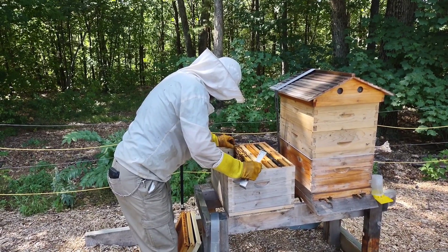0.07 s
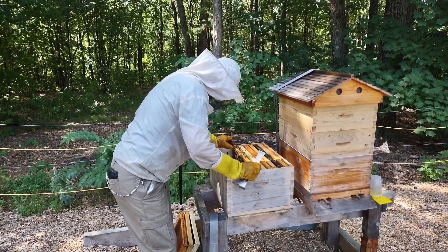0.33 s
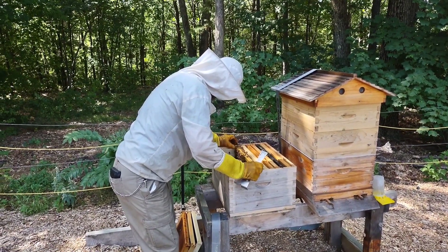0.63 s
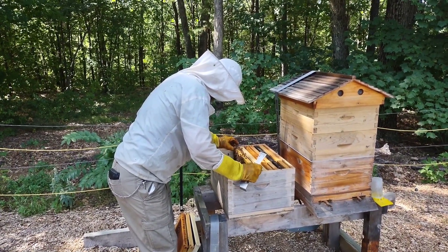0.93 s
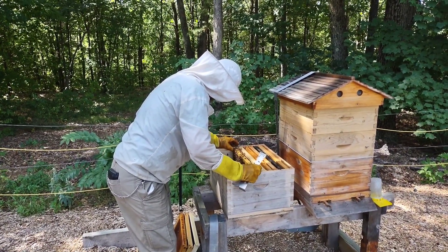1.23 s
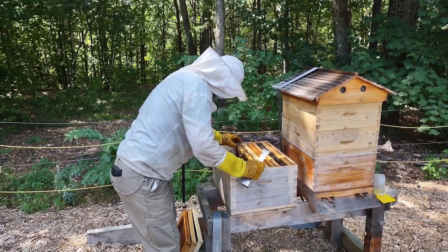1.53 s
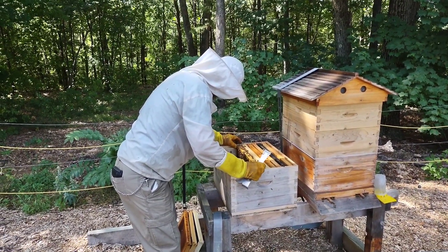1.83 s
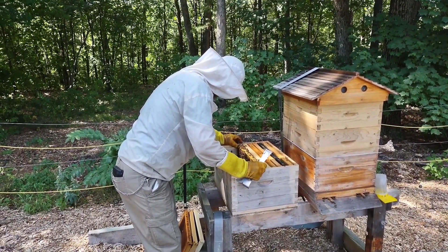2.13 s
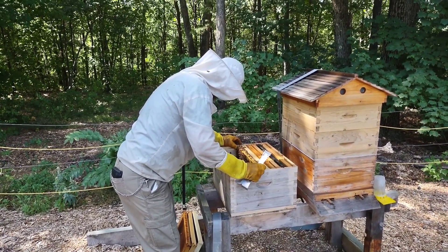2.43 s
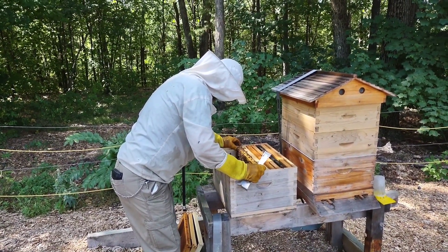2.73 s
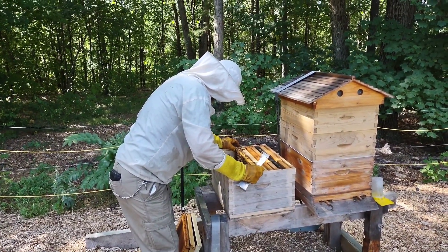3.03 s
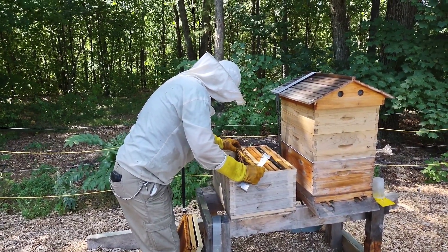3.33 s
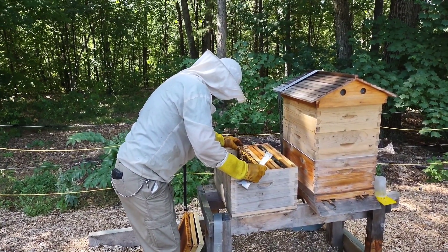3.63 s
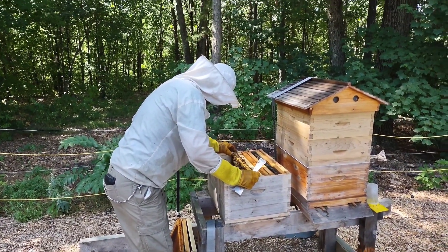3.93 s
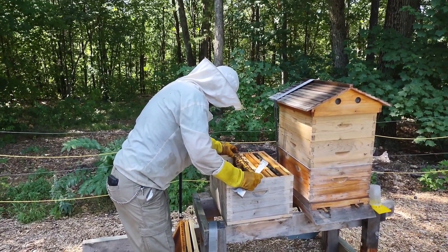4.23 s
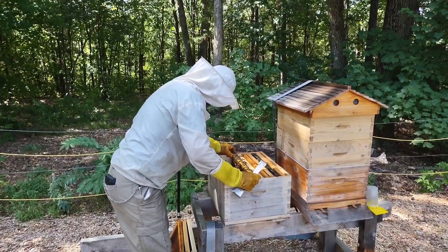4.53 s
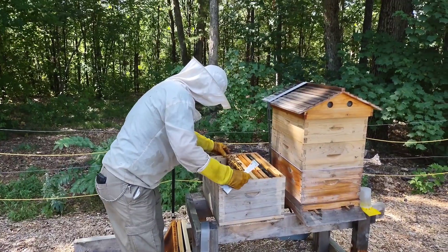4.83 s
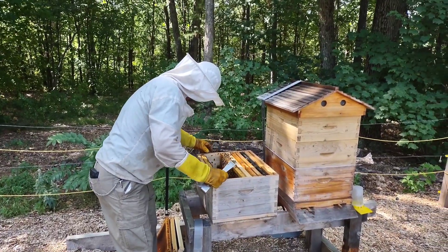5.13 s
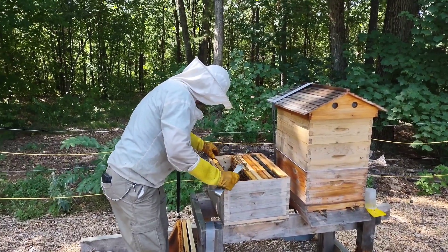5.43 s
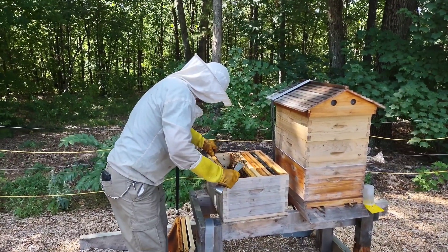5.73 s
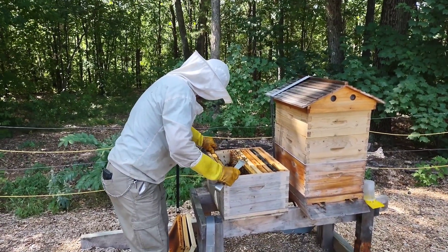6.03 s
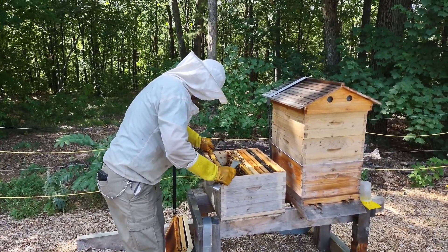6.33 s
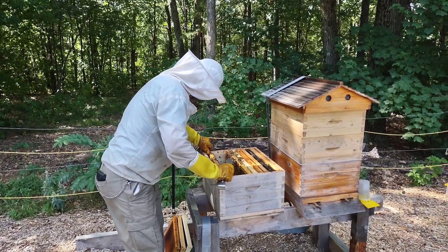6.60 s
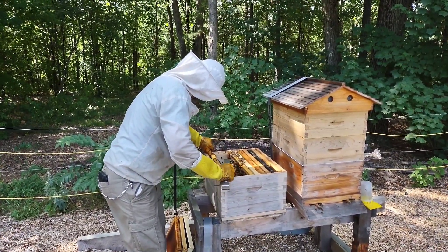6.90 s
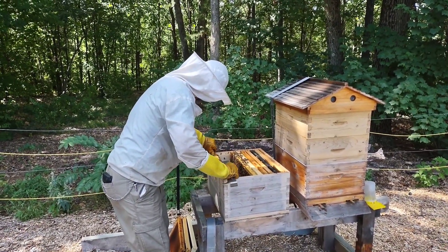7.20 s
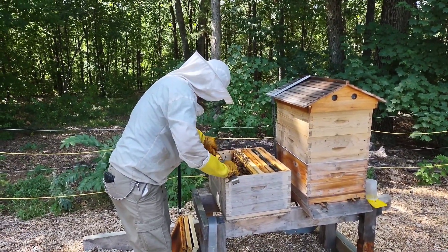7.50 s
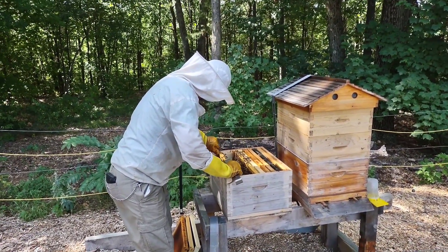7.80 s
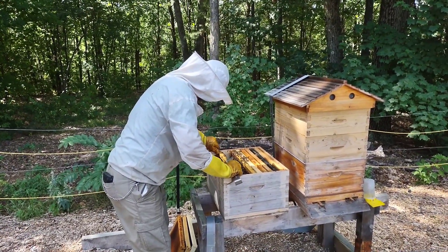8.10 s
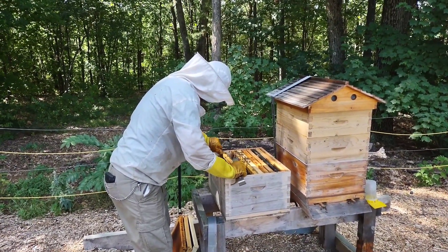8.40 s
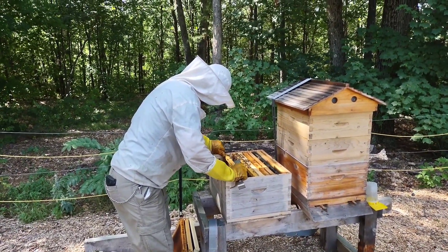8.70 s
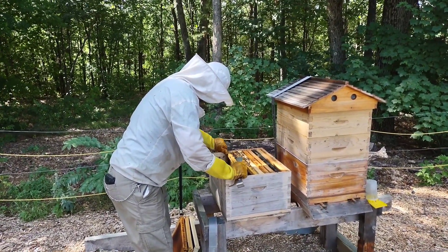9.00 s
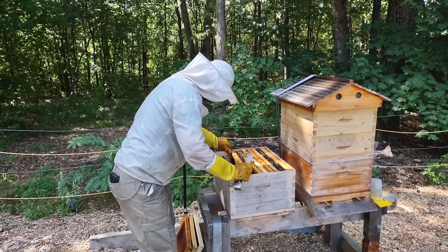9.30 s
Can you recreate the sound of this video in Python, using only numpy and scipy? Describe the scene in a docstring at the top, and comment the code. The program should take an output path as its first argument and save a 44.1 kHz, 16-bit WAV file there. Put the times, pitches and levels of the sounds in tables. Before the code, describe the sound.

Outdoors beside a beehive, a low swarm hum fills the middle, with a single bee swelling and fading near the microphone. Slightly to the right, a sticky wooden frame rasps quietly, gives one knock and then a short rattle of knocks. A thin insect trill and faint woodland whistles sit behind. In the second half a small metal tick sounds and the buzzing grows louder and closer.

```python
"""Honeybees hum around an open wooden hive at the edge of a wood. From the start, one bee's wingbeats
stand out of the swarm over a deep drone that comes and goes, while a frame rubs in its box, an insect
trills high up and faint whistles carry from the trees. The frame knocks once at 2.4 s and judders near
4 s. Around 6 s the bees are stirred up and the drone returns; a metal tool ticks at 6.4 s, and the
nearest bee is at its loudest from there to the end."""
import sys
import numpy as np
from scipy import signal
from scipy.fft import rfft, irfft
from scipy.io import wavfile
from scipy.ndimage import map_coordinates

SR = 44100
rng = np.random.default_rng(int(sys.argv[2]) if len(sys.argv) > 2 else 0)


def to_wav(sig):
    """Store sig (one row per channel, or 1-D mono) as 16-bit WAV at the path in sys.argv[1].

    Samples outside -1..1 are clipped; the rate is SR.
    """
    pcm = np.clip(np.atleast_2d(sig), -1, 1) * 32767
    pcm = np.round(pcm).astype(np.int16)
    wavfile.write(sys.argv[1], SR, pcm.T)  # frames by channels


N = 421155
T = np.arange(N) / SR  # time of each sample [s]
F = np.maximum(np.fft.rfftfreq(N, 1 / SR), 1)  # frequencies of the spectrum [Hz]
RIGHT_LAG_S = 0.000444  # how much later a sound reaches the right side

# how fast the nearest bee beats its wings: (time [s], wingbeat [Hz])
WINGBEAT_RATE = [(0, 141), (1.1, 140.5), (2.2, 140.5), (3.2, 140), (3.9, 138), (4.6, 137.5), (5.5, 138),
                 (6.3, 136.5), (6.9, 135.5), (7.3, 135), (8, 135.6), (8.7, 134.2), (9.55, 133.2)]
# its tone at the wingbeat rate, the first harmonic: (time [s], level [dB])
FIRST_HARMONIC = [(0.0, -58), (0.65, -53.0), (1.1, -57.5), (1.3, -64), (1.5, -56), (2.0, -56.5), (2.2, -50),
                  (2.75, -55), (3.15, -47.5), (3.78, -68), (3.96, -55.5), (4.2, -77), (4.6, -53),
                  (5.0, -73.5), (5.65, -59.5), (6.3, -64.0), (6.75, -42), (7.02, -39.0), (7.42, -58.5),
                  (7.7, -49.5), (7.85, -55), (8.7, -40.5), (9.3, -46.5), (9.55, -54)]
# its tone at twice that rate: (time [s], level [dB])
SECOND_HARMONIC = [(0.0, -73.5), (2.08, -72.5), (2.25, -56.5), (2.9, -59.0), (3.18, -53.5), (3.7, -68.5),
                   (4.0, -60), (4.25, -69.0), (4.55, -58.5), (5.2, -68), (5.55, -59.5), (6.25, -74),
                   (6.75, -50), (7.0, -57.5), (7.3, -50.5), (7.5, -64.5), (7.72, -50.5), (8.15, -60.5),
                   (8.55, -54), (9.22, -47.5), (9.55, -54)]
# its tone at three times that rate, heard once the bee is close: (time [s], level [dB])
THIRD_HARMONIC = [(0.0, -84), (6.25, -80), (6.72, -69.0), (6.88, -58.5), (7.25, -63), (7.5, -67.5),
                  (8.03, -61.0), (8.55, -64.0), (9.35, -48), (9.55, -51.5)]
# how busy the swarm is: (time [s], relative level [dB])
SWARM_ACTIVITY = [(0.0, -64.5), (0.9, -62.5), (2.05, -65), (2.3, -60), (3.1, -58.5), (4.2, -66), (4.6, -62),
                  (5.1, -67.5), (6.4, -66), (6.95, -54), (7.6, -62), (8.6, -55.5), (9.0, -57), (9.3, -55),
                  (9.55, -54.5)]
# the swarm's low hum: (frequency [Hz], relative level [dB])
HUM_SPECTRUM = [(18, -42), (28, -18), (45, 1), (60, 4.5), (105, 11), (180, 6), (240, 4.5), (300, -7.5),
                (420, -41), (900, -63.5)]
# the swarm's brighter buzz: (frequency [Hz], relative level [dB])
BUZZ_SPECTRUM = [(50, -49.5), (200, -9.5), (290, 0.5), (350, -2), (440, -7), (540, -21.5), (660, -17),
                 (880, -13), (1150, -23), (2200, -28.5), (3200, -38), (8000, -77)]
# the murmur inside the box: (time [s], level [dB])
COLONY_LEVEL = [(0, -74), (3.6, -75.5), (4.6, -84), (6.2, -82), (6.9, -74), (8.5, -78.5), (9.55, -84)]
# the deep drone, one list for each swell: (time [s], pitch [Hz], level [dB])
DRONE_SWELLS = [
    [(0, 73.5, -53.5), (.25, 73.2, -53), (.85, 73.1, -58.5), (1.6, 72.6, -56.5), (1.92, 72.5, -53),
     (2.1, 69.5, -60)],
    [(5.9, 76.7, -58.5), (6.59, 77.7, -48.5), (6.75, 75.3, -48.5), (7.24, 75.2, -46), (7.44, 73.5, -55),
     (7.8, 73.3, -48.5), (8.05, 72.5, -56), (8.35, 71.8, -51), (9.55, 74.3, -48)],
]
# the background wash among the trees: (frequency [Hz], relative level [dB])
AIR_SPECTRUM = [(20, -14.5), (60, 5), (300, -2), (520, -7), (820, -2), (1150, -9), (1600, -12.5),
                (2200, -15.5), (3200, -22), (4200, -22.5), (6000, -27), (10000, -29.5), (15500, -31)]
# where wood sliding on wood rings: (frequency [Hz], width [Hz], relative level [dB])
RASP_RESONANCES = [(2130, 370, -1.5), (2590, 300, 1.5), (3200, 520, 2.5), (3820, 680, -3), (4360, 380, -2)]
# the hiss of rubbing: (frequency [Hz], relative level [dB])
RUB_SPECTRUM = [(900, -13.5), (1800, -9), (2100, -4), (2900, -7), (4200, -8), (5200, -16), (7500, -21.5),
                (11000, -23.5), (15000, -50.5)]
# firmer strokes of the frame: (peak time [s], spread [s], level [dB])
FRAME_STROKES = [(1.75, 0.31, -71.5), (2.225, 0.16, -71), (2.947, 0.64, -76), (4.078, 0.11, -75.5),
                 (8.35, 0.15, -80.5)]
# when the near insect trills: (start [s], end [s], level [dB])
TRILL_PHRASES = [(-.5, 4.35, -88), (4.8, 5.1, -82.5)]
# thin insect whines: (start [s], end [s], start pitch [Hz], end pitch [Hz], width [Hz], level [dB])
INSECT_WHINES = [(-.4, 2.24, 8020, 8130, 80, -85), (2.6, 3.3, 7830, 8070, 110, -87),
                 (3.1, 4.3, 8100, 7960, 89.5, -85), (4.2, 5.4, 8000, 7850, 90, -89.5),
                 (6.1, 7.5, 7950, 8100, 70, -91.5), (7.4, 8.2, 8040, 8070, 70, -93),
                 (6.4, 8.83, 8670, 8760, 70, -100)]
# whistles in the trees: (start [s], end [s], start pitch [Hz], end pitch [Hz], width [Hz], level [dB])
TREE_WHISTLES = [(-.3, 0.406, 760, 738, 27, -67), (0.1, 1.8, 4720, 4420, 230, -84),
                 (2.7, 3.8, 4380, 4600, 160, -93), (4, 5.4, 4300, 4120, 160, -82),
                 (5.15, 5.75, 3500, 3860, 290, -83), (1.15, 2.6, 2040, 2070, 260, -73),
                 (1.3, 2.5, 510, 590, 104, -72), (-1, 3.1, 3000, 2900, 90, -94),
                 (4, 5.2, 3280, 3260, 95, -79), (4.22, 4.78, 1360, 1450, 70, -70.5),
                 (4.95, 6.3, 830, 850, 110, -68.5), (5, 6.1, 2080, 1880, 200, -84),
                 (7.1, 8.3, 2170, 2150, 99, -83.5), (8.2, 8.7, 2100, 2130, 280, -72.5)]
# faint extra tones around the nearest bee's harmonics: (start [s], end [s], pitch [Hz], level [dB])
WING_UNDERTONES = [(1.497, 2.05, 425, -72.5), (2.2, 3.504, 186.8, -62.5), (2.096, 3.4, 231, -67),
                   (3.595, 4.902, 227.7, -66.5), (4.1, 5.6, 90, -66), (4.3, 4.9, 181, -70),
                   (4.3, 4.9, 317.5, -74), (6.8, 9.9, 179, -63.5), (7.6, 8.151, 344, -59),
                   (7.8, 8.801, 310.6, -59.5), (8.302, 9.703, 222, -66), (8.7, 9.7, 353.7, -67.5)]
# the frame hitting its box: (time [s], level [dB], decay [s], relative level of the grit [dB])
FRAME_KNOCKS = [(2.439, -58.5, 0.033, -25), (3.895, -57.5, 0.025, -18), (3.92, -56, 0.042, -13),
                (3.958, -58, .04, -19), (3.986, -57.5, 0.094, -16), (4.068, -70, 0.055, -14)]
# where frame and box ring: (frequency [Hz], width [Hz], relative level [dB])
BOX_RESONANCES = [(175, 110, 11.5), (610, 250, 0.5), (780, 130, 4), (974, 110, 1.5), (1320, 330, -9),
                  (1790, 320, -6.5), (2460, 360, -13), (3300, 420, -12)]
# light brushes of the gloves: (peak time [s], spread [s], frequency [Hz], width [Hz], level [dB])
GLOVE_BRUSHES = [(3.018, .05, 7340, 2500, -83), (3.16, 0.16, 2010, 2500, -76.5),
                 (5.13, 0.064, 4180, 3000, -78.5), (7.704, 0.064, 1900, 1500, -83)]
# the two parts of the tool's tick: (time [s], decay [s], frequency [Hz], width [Hz], level [dB])
TICK_PARTS = [(6.425, 0.022, 4700, 2000, -75), (6.425, 0.033, 3160, 300, -74)]


def undb(db):
    """Turn decibels into a gain to multiply by."""
    return 10 ** (np.asarray(db) / 20)


def unit(x):
    """Scale a signal to an average (rms) level of 1."""
    return x / np.sqrt(np.mean(x ** 2))


def curves(table):
    """Join each column of a table with straight lines over time."""
    times, *columns = np.transpose(table)
    return [np.interp(T, times, column) for column in columns]


def held(start, end, fade_s):
    """A gain of 1 from start to end, dying away on both sides."""
    return np.exp(-np.abs(T - np.clip(T, start, end)) / fade_s)


def walk(rate):
    """A smooth random wobble of size about 1, turning about rate times a second."""
    steps = rng.standard_normal(4096)
    coarse = map_coordinates(steps, [T[::32] * rate], order=3, mode="wrap")
    return np.interp(T, T[::32], coarse)


def colour(spectrum):
    """Turn a spectrum table into a gain for every frequency."""
    hz, db = np.transpose(spectrum)
    return undb(np.interp(np.log(F), np.log(hz), db))


def band(hz, width):
    """A steep-sided resonance: it passes frequencies near hz and weakens the rest."""
    return (1 / (1 + 1j * (F / hz - hz / F) * hz / width)) ** 2


def ringing(resonances):
    """Add up the resonances of one object."""
    return sum(undb(db) * np.abs(band(hz, width)) for hz, width, db in resonances)


def tone(hz, lag_s):
    """A pure tone on a moving pitch, reaching the right side a little later."""
    cycles = np.cumsum(hz) / SR - hz * np.array([[0], [lag_s]])
    return np.sqrt(2) * np.sin(2 * np.pi * cycles)


def noise(gain, spread=0.75, split_hz=750, bass_spread=0.076):
    """Stereo noise shaped by gain: the bass is nearly alike on both sides, the treble mostly is not."""
    common, left, right = rfft(rng.standard_normal((3, N)))
    treble = 1 / (1 + (split_hz / F) ** 4)
    scattered = np.clip(bass_spread + treble * spread, 0, 1)
    lag = np.exp(-2j * np.pi * F * RIGHT_LAG_S * treble)
    shared = np.sqrt(1 - scattered) * np.array([common, common * lag])
    separate = np.sqrt(scattered) * np.array([left, right])
    return unit(irfft((shared + separate) * gain, N))


def pan(db):
    """Make the left side db louder than the right; below zero leans right."""
    return undb(np.array([[db], [-db]]) / 2)


def near_bee(flutter_db=1.1, overtone_flutter_db=2.5, jitter=0.00304, lag_s=0.00014, weak_db=-68):
    """Wingbeats make three strong harmonics that waver as the bee turns, and a rasp of higher ones."""
    hz = curves(WINGBEAT_RATE)[0] * (1 + jitter * walk(20))
    levels = [curves(FIRST_HARMONIC)[0] - 0.05 + flutter_db * walk(16)]
    for table in (SECOND_HARMONIC, THIRD_HARMONIC):
        levels.append(curves(table)[0] + 0.5 + overtone_flutter_db * walk(15))
    # a weak harmonic sinks into the swarm
    gains = [undb(db) / np.sqrt(1 + undb(weak_db - db) ** 2) for db in levels]
    out = sum(gain * tone(k * hz, lag_s) for k, gain in enumerate(gains, 1))
    for k in range(4, 9):  # the faint rasp follows the third harmonic
        rasp_db = -27 - 4 * (k - 4) + 2 * walk(9)
        out += gains[2] * undb(rasp_db) * tone(k * hz, lag_s)
    return out


def swarm(calm_buzz_db=-67.5, buzz_follows=0.76, stirred_s=5.9, stirring_s=0.8, stirred_db=8.5):
    """Countless wings blur into a low hum and a buzz, which grows as the bees are stirred up."""
    hum_db = curves(SWARM_ACTIVITY)[0] + 4
    stirred = .5 + .5 * np.tanh((T - stirred_s) / stirring_s)  # rises smoothly from 0 to 1
    buzz_db = calm_buzz_db + buzz_follows * (hum_db - hum_db.mean()) + stirred_db * stirred + walk(8)
    hum = undb(hum_db) * noise(colour(HUM_SPECTRUM))
    buzz = undb(buzz_db) * noise(colour(BUZZ_SPECTRUM), spread=0.67)
    return hum + buzz


def colony():
    """The bees still inside murmur through the hollow of the box."""
    return undb(curves(COLONY_LEVEL)[0]) * noise(band(hz=610, width=230))


def drone(flutter_db=1.5, fade_s=0.14, jitter=0.022):
    """A deep, nearly pure hum that swells twice."""
    out = 0
    for swell in DRONE_SWELLS:
        hz, db = curves(swell)
        gain = held(swell[0][0], swell[-1][0], fade_s) * undb(db + 0.1 + flutter_db * walk(18))
        out += gain * tone(hz * (1 + jitter * walk(20)), RIGHT_LAG_S)
    return out


def air(db=-66, sway_db=1.5):
    """A soft, gently swaying wash of noise from the trees all round."""
    return undb(db - sway_db * walk(0.866)) * noise(colour(AIR_SPECTRUM), spread=0.94)


def rubbing(slide_db=-78, rest_db=-91, grain_db=1.13, hiss_db=-3):
    """Gloves and frame slide with a grainy rasp that swells with each stroke, then nearly rest."""
    slide = undb(slide_db) * held(start=0, end=5.17, fade_s=0.77)
    strokes = [undb(db) * np.exp(-.5 * ((T - s) / spread) ** 2) for s, spread, db in FRAME_STROKES]
    friction = np.sqrt(undb(rest_db) ** 2 + slide ** 2 + sum(stroke ** 2 for stroke in strokes))
    grain = undb(grain_db * walk(60))
    rasp = noise(ringing(RASP_RESONANCES) + undb(hiss_db) * colour(RUB_SPECTRUM), spread=0.65)
    return friction * grain * rasp


def trill(chirps_per_s=19.1, sharpness=0.9, stagger=0.31, lower_db=-1, far_db=-100):
    """An insect's quick chirps, each dropping from an upper to a lower resonance."""
    phrases = [undb(db) * held(start, end, fade_s=0.2) for start, end, db in TRILL_PHRASES]
    gain = np.hypot(np.max(phrases, axis=0), undb(far_db))  # others of its kind go on far away
    cycle = chirps_per_s * T + .04 * walk(12)
    first = unit(np.exp(sharpness * np.cos(2 * np.pi * cycle)))
    second = unit(np.exp(sharpness * np.cos(2 * np.pi * (cycle - stagger))))
    upper = first * noise(band(hz=8740, width=240))
    lower = (.5 + .5 * second) * noise(band(hz=8490, width=130))
    return gain * unit(upper + undb(lower_db) * lower)


def whistles(notes):
    """Gliding whistles or whines, blurred by their many paths between the trees."""
    out = np.zeros((2, N))
    for start, end, start_hz, end_hz, width, db in notes:
        on = (T > start) & (T < end)
        progress = (T[on] - start) / (end - start)
        hz = start_hz + (end_hz - start_hz) * progress
        # slow noise shakes the level and phase of three paths: shared, left and right
        lowpass = signal.butter(2, width / 2, fs=SR, output="sos")
        slow = signal.sosfilt(lowpass, rng.standard_normal((6, N))[:, on])
        paths = slow[::2] + 1j * slow[1::2]
        direct = paths[0] * np.exp(-2j * np.pi * hz * np.array([[0], [RIGHT_LAG_S]]))
        glide = np.exp(2j * np.pi * np.cumsum(hz) / SR)
        note = np.real((direct + paths[1:]) * glide)
        out[:, on] += undb(db) * unit(note) * np.sqrt(np.sin(np.pi * progress))
    return out


def wing_undertones(jitter=0.004, flutter_db=2, lag_s=0.00021):
    """Faint extra tones swell and fade around the nearest bee's harmonics."""
    out = 0
    for start, end, hz, db in WING_UNDERTONES:
        progress = np.clip((T - start) / (end - start), 0, 1)
        arch = np.sqrt(np.abs(np.sin(np.pi * progress)))
        gain = undb(db + flutter_db * walk(8.3)) * arch
        out += gain * tone(hz * (1 + jitter * walk(9)), lag_s)
    return out


def knocks(rise_s=0.0027, grain_db=3, dull_hz=4200):
    """A sticky frame judders against the box: each blow is a short gritty push that rings the wood."""
    wax = 1 / np.sqrt(1 + (F / dull_hz) ** 6)  # wax on the frame softens the contact
    wood = noise(ringing(BOX_RESONANCES) * wax, spread=0.8)
    grit = noise(colour(RUB_SPECTRUM) * wax) * undb(grain_db * walk(300))
    out = 0
    for s, db, decay, grit_db in FRAME_KNOCKS:
        age = np.maximum(T - s, 0)
        blow = (1 - np.exp(-age / rise_s)) * np.exp(-age / decay)
        out += undb(db) * blow * (wood + undb(grit_db) * grit)
    return out


def brushes():
    """Gloves brush lightly past, each time with a brief hiss."""
    return sum(undb(db) * np.exp(-((T - s) / spread) ** 2) * noise(band(hz, width))
               for s, spread, hz, width, db in GLOVE_BRUSHES)


def tool_tick():
    """A metal hive tool taps a frame's top bar: a light tick that dies quickly."""
    return sum(undb(db) * (T > s) * np.exp(-np.abs(T - s) / decay) * noise(band(hz, width))
               for s, decay, hz, width, db in TICK_PARTS)


def scene():
    """Bees near the middle, frame, gloves and insects to the right, the trees all round."""
    bees = near_bee() + drone() + swarm() * pan(db=1.3) + wing_undertones() + colony()
    work = knocks() * pan(db=-3.5) + (rubbing() + brushes()) * pan(db=-4) + tool_tick()
    insects = (whistles(INSECT_WHINES) + trill()) * pan(db=-6)
    trees = air() + whistles(TREE_WHISTLES) * pan(db=1.5)
    return bees + work + insects + trees


def record(dry, fade_s=0.004, top_hz=15750):
    """Fade both ends quickly and cut away the highest treble."""
    fade = np.minimum(np.minimum(T, T[-1] - T) / fade_s, 1)
    lowpass = signal.ellip(10, .2, 70, top_hz, fs=SR, output="sos")
    return signal.sosfilt(lowpass, dry * fade)


dry = scene()
out = record(dry)
to_wav(out)
```